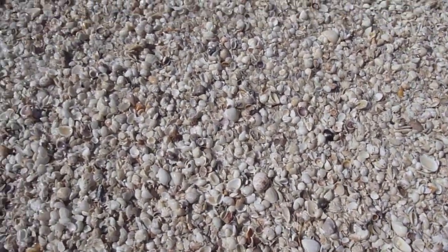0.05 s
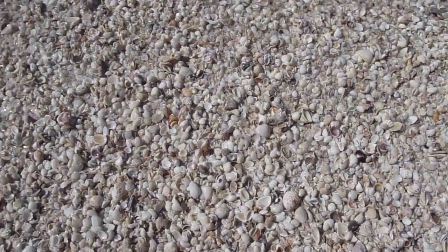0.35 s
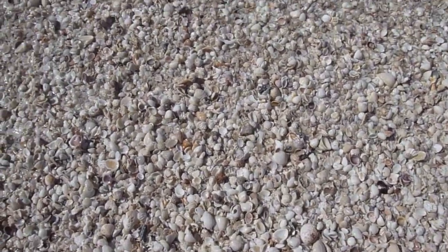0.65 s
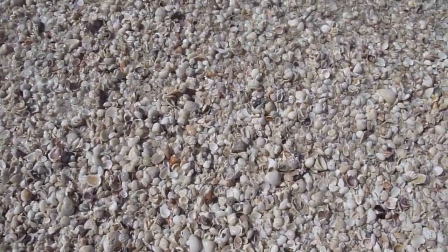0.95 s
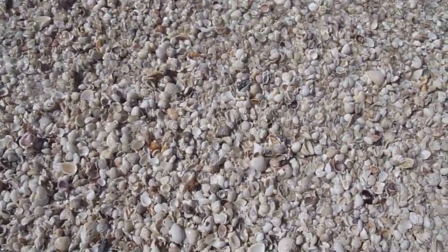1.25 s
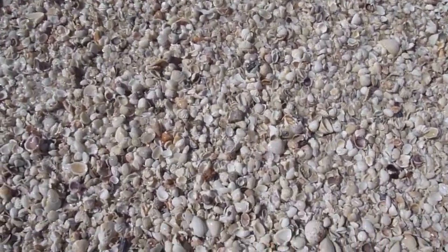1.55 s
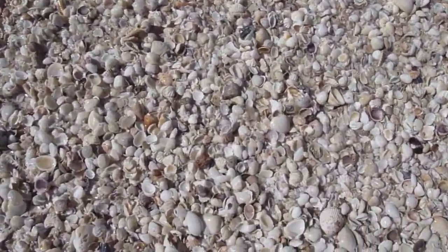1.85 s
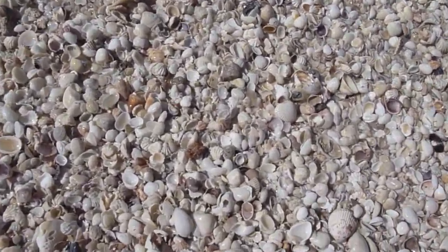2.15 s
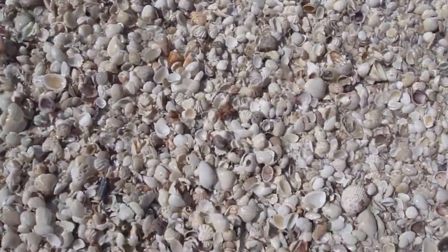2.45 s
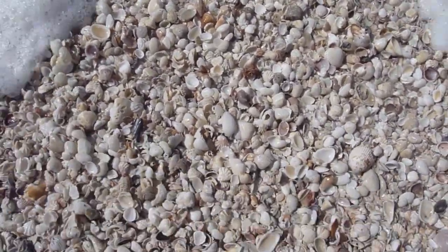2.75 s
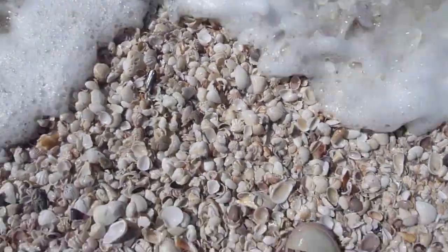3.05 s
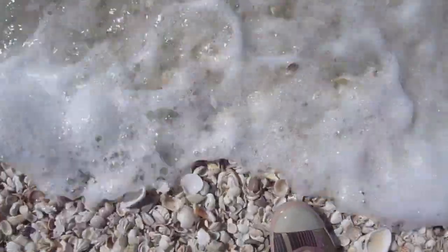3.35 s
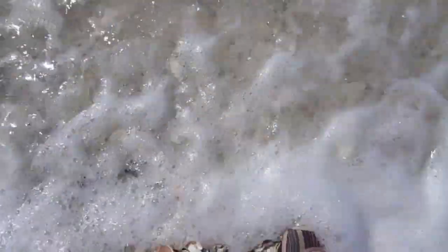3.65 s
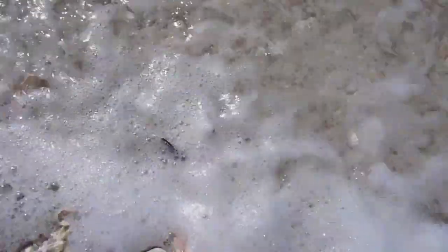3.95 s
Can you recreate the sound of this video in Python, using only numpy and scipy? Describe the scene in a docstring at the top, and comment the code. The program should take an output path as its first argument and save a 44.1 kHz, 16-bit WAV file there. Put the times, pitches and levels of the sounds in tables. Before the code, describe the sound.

A small wave washes up over a shell beach, with wind buffeting the microphone.

```python
"""On a beach of shells, a small wave breaks and its foam runs up to the microphone.
Churning water and large ringing bubbles make the low roar of the surf; the wash swells with
smaller bursting bubbles, and foam fizzes among shells that click and ring as they collide.
Wind eddies press on the microphone as a rumble and as short puffs, most in the first second."""
import sys
import numpy as np
from scipy import signal
from scipy.io import wavfile

SR = 44100
rng = np.random.default_rng(int(sys.argv[2]) if len(sys.argv) > 2 else 0)


def to_wav(sig):
    """Store sig (one row per channel, or 1-D mono) as 16-bit WAV at the path in sys.argv[1].

    Samples outside -1..1 are clipped; the rate is SR.
    """
    pcm = np.clip(np.atleast_2d(sig), -1, 1) * 32767
    pcm = np.round(pcm).astype(np.int16)
    wavfile.write(sys.argv[1], SR, pcm.T)  # frames by channels


N = 176400
T = np.arange(N) / SR

# wind rumble (time [s], level [dB])
WIND_LEVEL = [(0, -10.5), (.05, -26), (.085, -33), (.15, -25.5), (.26, -29.5), (.39, -23), (.54, -27),
              (.6, -25), (.9, -31), (1.3, -25.5), (1.6, -32.5), (1.8, -25), (1.95, -35), (2.2, -31),
              (2.5, -41), (2.85, -26.5), (3.1, -30.5), (3.3, -27.5), (3.7, -29), (4, -25)]
# puffs of wind (peak time [s], Gaussian half width [s], level [dB], upper edge [Hz])
WIND_PUFFS = [(0.021, 0.019, -21.5, 710), (0.056, 0.009, -22, 600), (0.141, 0.0018, -15.5, 720),
              (0.17, 0.0047, -23.5, 580), (0.221, 0.0065, -20.5, 660), (0.303, 0.019, -24.5, 750),
              (0.376, 0.019, -22.5, 760), (0.433, 0.0031, -15, 770), (0.476, 0.0045, -18.5, 380),
              (0.492, 0.0046, -13.5, 570), (0.529, 0.02, -22.5, 620), (0.585, 0.012, -15, 570),
              (0.684, 0.009, -16, 660), (0.789, 0.017, -18, 720), (1.115, 0.0067, -15.5, 710),
              (1.766, 0.021, -23, 600), (3.265, 0.0057, -19, 500), (3.857, 0.013, -19, 320),
              (3.902, 0.0066, -16, 500)]
# low thumps of wind, and one short, higher clack (time [s], peak level [dB], frequency [Hz])
THUMPS_AND_CLACK = [(0.0168, -11.5, 278), (0.0454, -16.5, 165), (0.381, -17.5, 140), (0.477, -13.5, 223),
                    (.588, -10, 345), (0.6809, -13.5, 1100), (0.683, -8.5, 304), (.783, -18.5, 330),
                    (1.776, -13, 260), (3.028, -13, 318), (3.843, -11, 233), (3.854, -14, 134),
                    (3.864, -18, 170)]
# roar of the surf (time [s], level [dB])
ROAR_LEVEL = [(0, -36.5), (.24, -52), (.35, -44), (.85, -35), (1.2, -30), (1.75, -27.5), (1.95, -30),
              (2.5, -29.5), (3.05, -28.5), (3.45, -25.5), (3.85, -27), (4, -33)]
# large bubbles popping (time [s], level [dB], frequency [Hz], t60 [s])
BUBBLE_POPS = [(0.568, -21.5, 2200, 0.011), (1.048, -10, 1250, 0.0052), (1.528, -16, 1260, 0.0084),
               (3.738, -7.5, 1400, 0.0059)]
# shells knocking together (time [s], level [dB], left minus right [dB])
SHELL_IMPACTS = [(0.533, -26.5, -5), (.569, -25, -7), (.638, -23, -5), (0.641, -21.5, -8),
                 (0.86, -24.5, -6), (1.049, -17, -9), (1.254, -17.5, -4), (1.335, -18, -7),
                 (1.423, -17.5, -9), (2.633, -10.5, 2), (2.849, -12.5, 0), (2.89, -9, 0), (3.472, -14, -5),
                 (3.52, -16, 6)]
# modes of a shell (frequency over the shell's pitch [ratio], level [dB], t60 [s])
SHELL_RESONANCES = [(.74, -13, 0.0021), (0.999, -8.5, 0.009), (1.209, -4, 0.0055)]
# water slapping over as it arrives (time [s], level [dB], centre frequency [Hz])
WATER_SLAPS = [(3.066, -26, 2700), (3.095, -25, 1300), (3.228, -28, 1260)]
# foam fizzing among the shells (time [s], level [dB])
FIZZ_LEVEL = [(0, -47), (.17, -56), (.31, -47.5), (.48, -49.5), (.58, -44), (.71, -51.5), (1.02, -44.5),
              (1.3, -39.5), (1.73, -35), (1.9, -41.5), (2.46, -31), (2.715, -37.5), (2.755, -28.5),
              (2.82, -29), (2.91, -26), (2.95, -31), (3.08, -34.5), (3.26, -31), (3.37, -36), (4, -37.5)]
# water washing up (time [s], level [dB])
WASH_LEVEL = [(0, -49), (.17, -52.5), (.31, -44), (.62, -44), (.73, -48), (1.22, -38), (1.38, -43),
              (1.75, -32), (1.89, -36.5), (2.25, -29), (2.49, -28), (2.66, -31), (2.93, -34.5),
              (3.05, -33.5), (3.09, -31), (3.35, -31.5), (4, -35)]
# direction of the wash, foam and splashes (time [s], left minus right [dB])
WASH_BALANCE = [(0, 0.5), (.35, -5.5), (.9, -8), (1.6, -0.5), (2, -4), (2.6, -3.5), (4, -2.5)]
# spectra of the four noise sources (frequency [Hz], relative spectral density [dB])
WIND_DENSITY = [(20, -11.5), (40, -13.5), (70, -4.5), (130, -6), (250, -2.5), (400, -12.5), (700, -24),
                (1400, -31.5), (3000, -52)]
ROAR_DENSITY = [(60, -18), (130, 1), (260, 0), (480, 0), (750, -2.5), (1100, -10.5), (1800, -14.5),
                (4000, -26)]
FIZZ_DENSITY = [(1500, -6.5), (2800, -8), (3800, 0.5), (4900, 8), (6300, 3), (7500, -3)]
WASH_DENSITY = [(400, -15), (800, -1), (1200, 1), (1900, -2), (2800, -0.5), (3800, -5), (6000, -14.5)]
# likeness of left and right, for water and for wind (frequency [Hz], correlation [-1 to 1])
WATER_CORRELATION = [(100, 0.98), (900, 0.94), (1900, 0.73), (3800, 0.25), (7500, .72)]
WIND_CORRELATION = [(20, .15), (400, -0.024)]


def from_db(db):
    """Amplitude grows tenfold for every 20 dB."""
    return 10 ** (np.asarray(db) / 20)


def rms_one(x):
    """Normalisation to unit mean power."""
    return x / np.sqrt(np.mean(x ** 2) + 1e-20)


def in_time(rows):
    """Linear interpolation of a curve at every sample."""
    return np.interp(T, *np.transpose(rows))


def at_hz(points, hz):
    """Interpolation on a logarithmic frequency axis."""
    frequencies, values = np.transpose(points)
    return np.interp(np.log(hz), np.log(frequencies), values)


def panned(db):
    """Constant-power panning: left and right gains for a level difference."""
    gains = from_db(np.array([[.5], [-.5]]) * db)
    return gains / np.sqrt(np.mean(gains ** 2, axis=0))


def butter(x, hz, kind, order=2):
    """Causal Butterworth filtering, maximally flat in the passband."""
    return signal.sosfilt(signal.butter(order, hz, kind, fs=SR, output="sos"), x)


def drift(rate_hz):
    """Low-passed noise wanders slowly, with unit rms."""
    step, settle = 40, 2000  # samples per noise value; values dropped while the filter settles
    pole = np.exp(-2 * np.pi * rate_hz * step / SR)
    white = rng.standard_normal(N // step + settle + 2)
    slow = signal.lfilter([1], [1, -2 * pole, pole * pole], white)[settle:]
    return np.interp(np.arange(N) / step, np.arange(len(slow)), rms_one(slow))


def stereo(pair, correlation):
    """Sum and difference of two independent signals give channels of a chosen correlation."""
    mid = np.sqrt(1 + correlation) * pair[0]
    side = np.sqrt(1 - correlation) * pair[1]
    return mid + side * np.array([[1], [-1]])


def ring(clicks, hz, t60):
    """A damped resonator answers each impulse with a decaying sine."""
    radius, angle = np.exp(-np.log(1000) / (t60 * SR)), 2 * np.pi * hz / SR
    return signal.lfilter([0, np.sin(angle)], [1, -2 * radius * np.cos(angle), radius ** 2], clicks + 1e-18)


def struck(onset, hz, t60):
    """Free vibration of one mode, falling 60 dB in t60 seconds."""
    out, age = np.zeros(N), T[:SR // 10]
    start = int(onset * SR)
    tone = np.sin(2 * np.pi * hz * age) * np.exp(-np.log(1000) * age / t60)
    out[start:start + len(age)] = tone[:N - start]
    return out


def turbulence(spectrum, correlation, shared_db, own_db, rate_hz):
    """Random modulation: half-octave noise bands flutter together and on their own; unit rms."""
    edges = 20 * 2 ** np.arange(0, 9.1, .5)
    out, shared = 0, shared_db * drift(rate_hz)
    white = rng.standard_normal((2, 2, N))
    for k, (low, high) in enumerate(zip(edges, edges[1:])):
        hz, own = np.sqrt(low * high), own_db * drift(rate_hz)
        if spectrum[0][0] < high and low < spectrum[-1][0]:
            pair = butter(white[k % 2], [low, high], "band", order=3)
            band = stereo(pair, at_hz(correlation, hz))
            out = out + band * from_db(at_hz(spectrum, hz) + shared + own)
    return rms_one(out)


def grains(spectrum, low_hz, high_hz, per_s, cycles, spread_db, width_db, pitches=24):
    """Shot noise: random impulses excite resonators that fall 60 dB in `cycles` periods; unit rms."""
    when, pitch, size, sign, side = rng.random((int(per_s * N / SR), 5)).T
    size_db = spread_db * np.minimum(-np.log(1 - size), 5)  # many weak, few strong
    impulses = from_db(size_db) * np.sign(sign - .5) * panned(width_db * (2 * side - 1))
    out = 0
    for k, hz in enumerate(np.geomspace(low_hz, high_hz, pitches)):
        clicks, chosen = np.zeros((2, N)), (pitch * pitches).astype(int) == k
        clicks[:, (when[chosen] * N).astype(int)] = impulses[:, chosen]
        out = out + ring(clicks, hz, cycles / hz) * hz * from_db(at_hz(spectrum, hz))
    return rms_one(out)


def wind():
    """Turbulent pressure on the microphone makes a lumpy rumble, nearly uncorrelated between channels."""
    rumble = turbulence(WIND_DENSITY, WIND_CORRELATION, shared_db=1.84, own_db=3.5, rate_hz=26)
    return from_db(in_time(WIND_LEVEL)) * rumble


def puffs(low_hz=230):
    """An eddy hitting the microphone is a burst of low noise under a Gaussian envelope."""
    out = 0
    eddies = butter(stereo(rng.standard_normal((2, N)), correlation=-0.56), low_hz, "high")
    for peak_time, half_width, db, edge_hz in WIND_PUFFS:
        swell = np.exp(-.5 * ((T - peak_time) / half_width) ** 2)
        puff = butter(eddies, edge_hz, "low", order=4) * swell
        out = out + from_db(db) * rms_one(puff) * np.sqrt(np.mean(swell ** 2))
    return out


def thumps_and_clack(half_width_cycles=0.52):
    """Wave packets, a few swings of pressure each: low thumps of wind, and one short, higher clack."""
    out = 0
    for peak_time, db, hz in THUMPS_AND_CLACK:
        cycles = (T - peak_time) * hz
        swell = np.exp(-.5 * (cycles / half_width_cycles) ** 2)
        out = out + from_db(db) * np.cos(2 * np.pi * cycles) * swell
    return out


def roar():
    """Turbulence in the breaking wave roars, and large bubbles resonate as a low gurgle."""
    churn = turbulence(ROAR_DENSITY, WATER_CORRELATION, shared_db=-0.24, own_db=-0.5, rate_hz=9.7)
    gurgle = grains(ROAR_DENSITY, 275.6, 1444, per_s=350, cycles=18, spread_db=2.5, width_db=-0.5)
    return from_db(in_time(ROAR_LEVEL)) * (churn + from_db(-8) * gurgle)


def pops():
    """A large bubble bursting close by rings as a damped oscillator."""
    return panned(-2.8) * sum(from_db(db) * struck(onset, hz, t60) for onset, db, hz, t60 in BUBBLE_POPS)


def shells(pitch_hz=5720, spread_octaves=0.16, crack_db=-6, crack_decay_s=0.0016):
    """Impact excites vibration: a dry crack at contact, then the brief ring of the shell's modes."""
    out, grit = 0, rms_one(butter(rng.standard_normal(N), [3500, 7500], "band"))
    for onset, db, pan_db in SHELL_IMPACTS:
        hz = pitch_hz * 2 ** (spread_octaves * rng.uniform(-0.91, 1))
        decay = (T >= onset) * np.exp(-np.minimum(np.abs(T - onset) / crack_decay_s, 20))
        crack = from_db(crack_db) * grit * decay
        modes = sum(from_db(mode_db) * struck(onset, hz * ratio, t60)
                    for ratio, mode_db, t60 in SHELL_RESONANCES)
        out = out + panned(pan_db) * from_db(db) * (crack + modes)
    return out


def splashes(rise_s=.006, decay_s=0.026):
    """Each slap throws a spray of bubbles, heard as an octave of noise in exponential decay."""
    out = 0
    for onset, db, hz in WATER_SLAPS:
        age = np.maximum(T - onset, 0)
        envelope = (1 - np.exp(-age / rise_s)) * np.exp(-age / decay_s)
        noise = stereo(rng.standard_normal((2, N)), correlation=0.62)
        spray = rms_one(butter(noise, [hz / np.sqrt(2), hz * np.sqrt(2)], "band"))
        out = out + from_db(db) * spray * envelope
    return out


def fizz():
    """Foam hisses while countless small shells collide, their high resonances adding incoherently."""
    hiss = turbulence(FIZZ_DENSITY, WATER_CORRELATION, shared_db=1.2, own_db=1.6, rate_hz=25)
    ticks = grains(FIZZ_DENSITY, 2800, 7200, per_s=3000, cycles=18, spread_db=2.8, width_db=14)
    return from_db(in_time(FIZZ_LEVEL)) * (hiss + from_db(-2) * ticks)


def wash():
    """Turbulent water rushes up the beach, full of small bubbles that resonate as they burst."""
    rush = turbulence(WASH_DENSITY, WATER_CORRELATION, shared_db=0.94, own_db=0.96, rate_hz=8.1)
    bubbles = grains(WASH_DENSITY, 930, 3970, per_s=1800, cycles=14, spread_db=1.5, width_db=0)
    return from_db(in_time(WASH_LEVEL)) * (rush + from_db(-1.5) * bubbles)


def scene():
    """Superposition of the surf, ahead and a little to the right, and the wind on the microphone."""
    water = roar() + panned(in_time(WASH_BALANCE)) * (wash() + fizz() + splashes())
    return water + shells() + pops() + wind() + puffs() + thumps_and_clack()


def record(dry, rolloff_hz=6774, cutoff_hz=7450):
    """Band limiting: the treble rolls off, then an elliptic low-pass cuts it steeply."""
    soft = butter(dry, rolloff_hz, "low", order=14)
    return signal.sosfilt(signal.ellip(10, .2, 85, cutoff_hz, fs=SR, output="sos"), soft)


dry = scene()
out = record(dry)
to_wav(out)
```